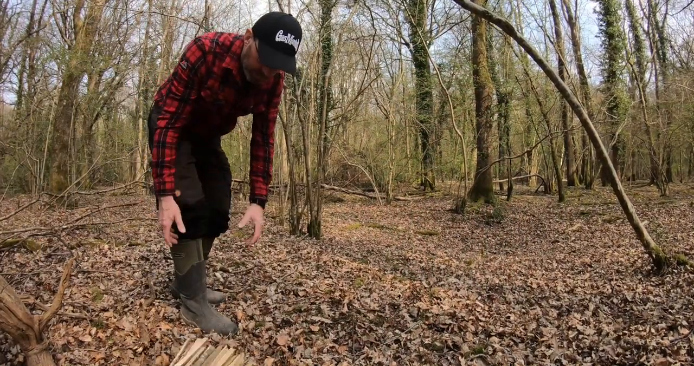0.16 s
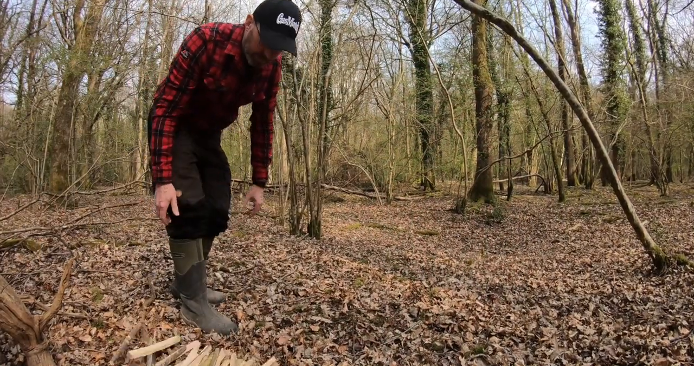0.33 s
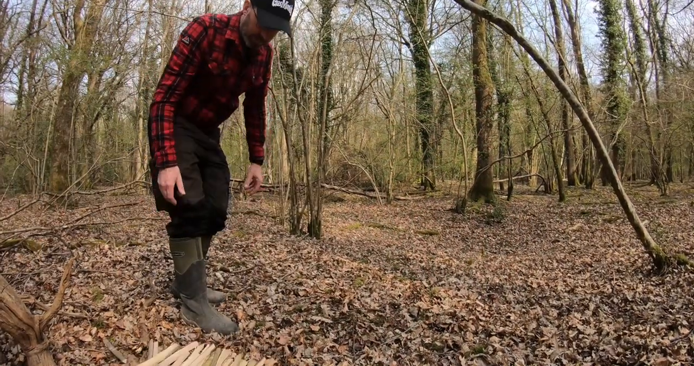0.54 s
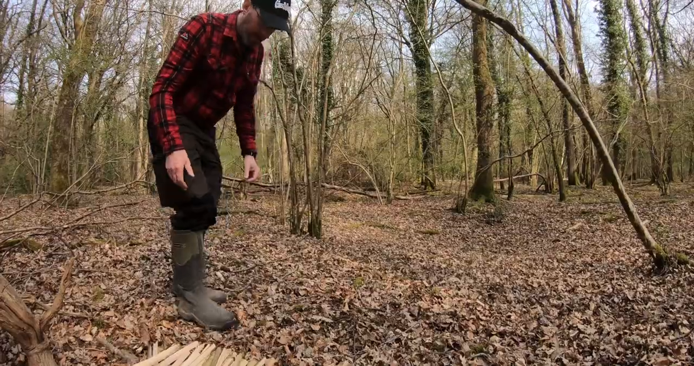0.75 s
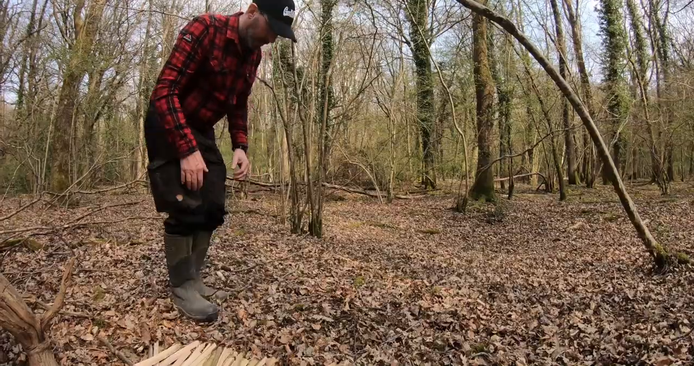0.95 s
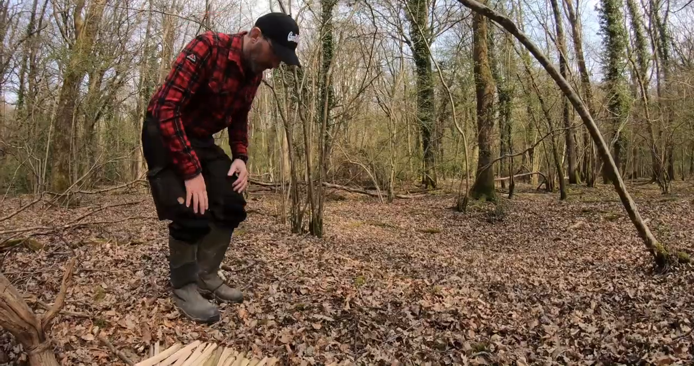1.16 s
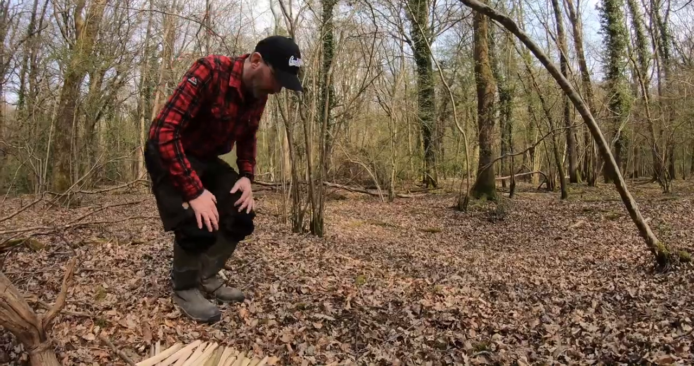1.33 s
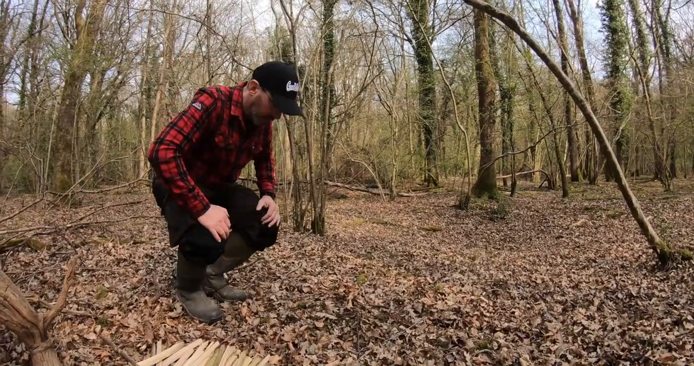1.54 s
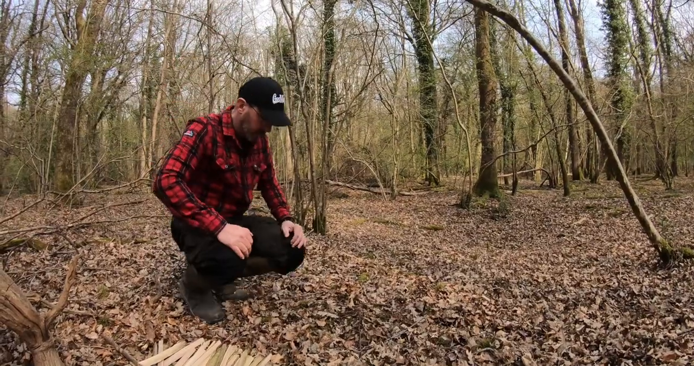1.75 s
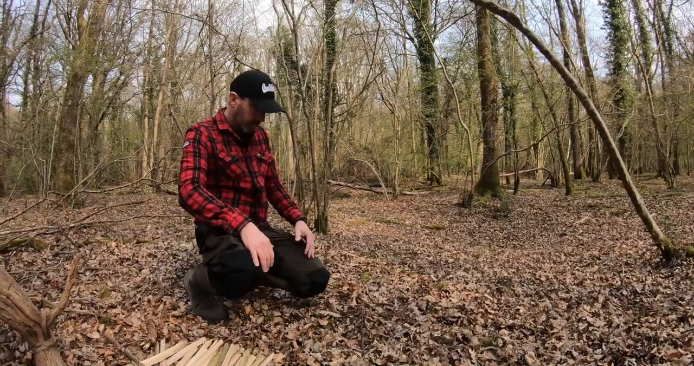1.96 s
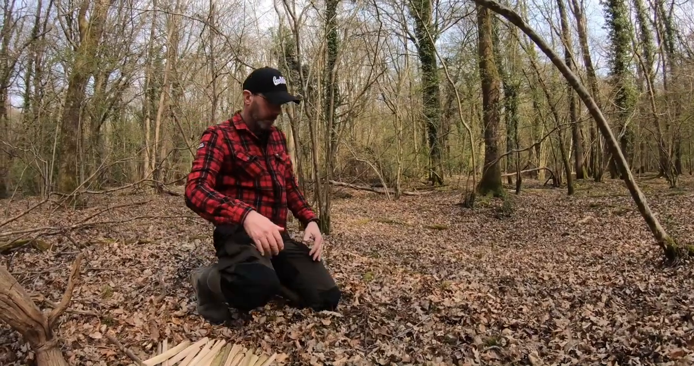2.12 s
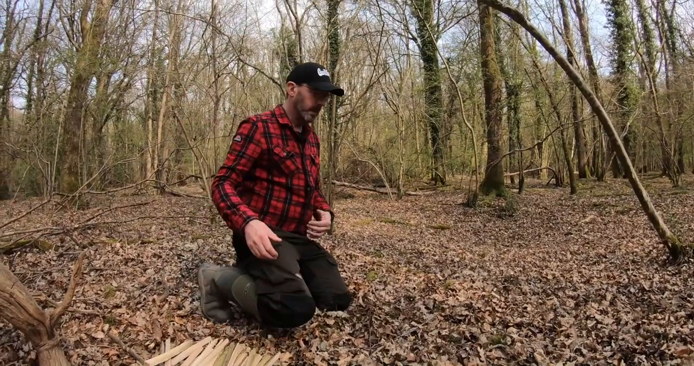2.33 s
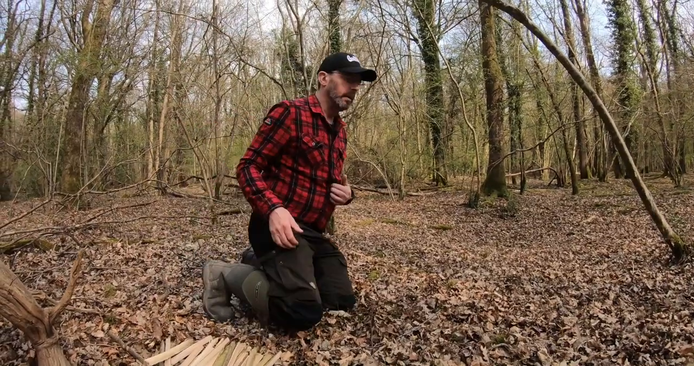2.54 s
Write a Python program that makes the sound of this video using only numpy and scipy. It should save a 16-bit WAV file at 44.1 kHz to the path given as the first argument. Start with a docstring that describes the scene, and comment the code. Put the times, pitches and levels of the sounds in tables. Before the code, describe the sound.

Split wooden sticks drop onto dry leaves with a crunch, soft thud and brief clatter; then boots and knees rustle the litter with sharp twig cracks, close stereo in a quiet wood with faint birds.

```python
"""A bundle of split sticks drops onto dry leaves in a quiet wood: a crunch, a thud, then a clatter as the pile spreads.
The clatter is decaying wood modes after rough contacts; the crunch is coloured crackle, the thud a damped low swing.
Close by, someone steps and kneels: leaves rustle as showers of tiny fractures, and twigs or joints crack as short snaps.
Far off a small bird pipes in arched sine notes over a blur of birdsong, and light air rumbles at the microphone,
all made of filtered noise but the notes. A close stereo pair hears it, with a faint echo from the trees."""
import sys
import numpy as np
from scipy import signal
from scipy.fft import rfft, irfft
from scipy.io import wavfile

SR = 44100
rng = np.random.default_rng(int(sys.argv[2]) if len(sys.argv) > 2 else 0)


def store_pcm(level_fs):
    """Save levels as 16-bit WAV."""
    pcm = np.round(np.clip(level_fs, -1, 1) * 32767).astype(np.int16)
    wavfile.write(sys.argv[1], SR, np.atleast_2d(pcm).T)


N = 114660  # length in samples


def amp(db):
    """Converts decibels to gain."""
    return 10 ** (np.asarray(db) / 20)


def unit(x):
    """Scales a signal to rms 1."""
    return x / np.sqrt(np.mean(x ** 2) + 1e-20)


def read(points, hz):
    """Reads a spectrum table on a log-frequency axis."""
    f, value = np.transpose(points)
    return np.interp(np.log(hz + 1), np.log(f + 1), value)


def level(rows, axis=1):
    """Gain over time from a table in dB; outside its span the end value fades away."""
    rows, t = np.array(rows), np.arange(N) / SR
    outside = np.maximum(np.maximum(rows[0, 0] - t, t - rows[-1, 0]), 0)
    gain = amp(np.interp(t, rows[:, 0], rows[:, axis]))
    return gain * np.exp(-outside / .03)


def add(mix, s, sound):
    """Mixes a sound in at a time in seconds."""
    part = mix[max(round(s * SR), 0):][:len(sound)]
    part += sound[:len(part)]


def causal(db_at, size=4096):
    """Minimum-phase impulse response: it starts at once and has the given spectrum."""
    hz = abs(np.fft.fftfreq(size, 1 / SR))
    log_gain = np.log(amp(np.maximum(db_at(hz), -90)))
    spectrum = np.exp(np.conj(signal.hilbert(log_gain)))
    return np.fft.ifft(spectrum).real[:size // 2]


def colour(x, points):
    """Filters a signal by a spectrum table, at rms 1."""
    response = causal(lambda hz: read(points, hz))
    return unit(signal.fftconvolve(x, response)[:len(x)])


def hump(hz, centre, octaves):
    """A broad peak in dB, with skirts that straighten on a log-frequency axis."""
    distance = np.log2((hz + 1) / centre) / octaves
    return -20 * (np.sqrt(1 + distance ** 2) - 1)


# Modes of the split sticks. Each row: frequency in Hz, level in dB, 60 dB decay time in seconds.
WOOD_MODES = [(700,-10,.05),(810,-6.5,0.043),(957,-10,0.11),(1202,-9.5,.12),(1310,-12,0.095),(1460,-1.5,0.042),(1637,-3.5,0.091),(2197,2,0.061),(2417,-3.5,0.048),(2966,-2,0.044),(3020,-15,0.045),(3182,1.5,0.046),(3620,0,0.042),(4398,-5,0.058),(4900,3,0.034),(5650,-6,.04)]
# Stick against stick, close by. Each row: start in seconds, level in dB,
# pitch that rings most in Hz, width of the ringing range in octaves.
KNOCKS = [(0.234,-28,5000,0.84),(0.2443,-19.5,4830,0.9),(.2492,-12.5,3070,0.31),(.2535,-14.5,3100,0.47),(.258,-13.5,2370,0.44),(0.2629,-29,960,0.33),(.280,-29,4150,0.43),(.304,-31.5,1680,0.89),(.331,-44,2020,1),(.361,-33,1310,.2),(.362,-41,2300,.6),(.368,-35,2200,0.62),(.392,-35,1900,0.64),(.410,-25,1770,0.48),(.416,-31,2420,.9),(.424,-35,1400,0.64),(.436,-29.5,1700,.6),(.445,-32,1080,.6),(.4505,-25.5,2950,0.25),(.453,-29.5,1637,0.22),(.469,-31,1190,.1),(.484,-33.5,1850,0.46),(0.498,-34,990,0.28),(.520,-36,1090,0.58),(.540,-45,1690,0.32),(.551,-53,850,0.35),(.575,-37.5,4040,.7),(.594,-50,1520,.7)]
MODE_SPREAD_DB, DETUNE = 2, 0.0032  # standard deviations per knock; detune as a fraction of pitch
CLACK_DB, CLACK_S, CLACK_OCTAVES = -3.5, 0.0042, 0.93  # rough contact: level, decay, bandwidth


def sticks():
    """Each knock is a short rough contact that rings the wood's modes around one pitch."""
    out, t = np.zeros(N), np.arange(SR // 4) / SR
    hz, db, t60 = np.transpose(WOOD_MODES)
    decay = np.exp(-np.log(1000) * t / t60[:, None])
    onset = 1 - np.exp(-t / 0.0005)
    for s, knock_db, centre, octaves in KNOCKS:
        strength, detune, sign = rng.standard_normal((3, len(hz)))
        weight = amp(db + MODE_SPREAD_DB * strength + hump(hz, centre, octaves))
        weight = np.sign(sign) * weight / np.linalg.norm(weight)
        mode_hz = hz * (1 + DETUNE * detune)
        modes = np.sin(2 * np.pi * mode_hz[:, None] * t) * decay
        ring = weight @ modes * onset
        contact = causal(lambda f: hump(f, centre, CLACK_OCTAVES))
        grit = signal.fftconvolve(rng.standard_normal(len(t)), contact)[:len(t)]
        clack = amp(CLACK_DB) * unit(grit) * np.exp(-t / CLACK_S)
        add(out, s, amp(knock_db) * (ring + clack))
    return out


FRACTURE_CAP = 3.67  # largest fracture, in multiples of the size spread


def crackle(per_s, spread_db):
    """Tiny leaf fractures as random clicks: many small, a few large."""
    size = amp(spread_db * np.minimum(rng.exponential(1, N), FRACTURE_CAP))
    return size * rng.choice([-1, 1], N) * (rng.random(N) < per_s / SR)


def thump(hz, rise_s):
    """A soft, heavily damped low swing whose envelope peaks after rise_s."""
    t = np.arange(SR // 4) / SR
    envelope = t / rise_s * np.exp(1 - t / rise_s)
    return np.sin(2 * np.pi * hz * t) * envelope


# The bundle crushes the leaves. Each row: time in seconds, level in dB.
CRUSH = [(.212,-79),(.224,-39.5),(.234,-27),(.246,-17.5),(.258,-25),(.267,-26),(.278,-43.5),(.31,-62)]
# Spectrum of the crushed litter. Each row: frequency in Hz, level in dB.
CRUSH_COLOUR = [(120, -30), (200, -26.5), (702, -7), (1510, -5), (2380, 0), (2650, -9), (3070, 6),
                (3750, -2), (4260, -3), (5700, -4.5), (8660, -18.5), (9480, -8), (15500, -44)]
# The ground takes the weight. Each row: start in seconds, level in dB, pitch in Hz,
# twice the envelope's rise time in seconds.
THUDS = [(.243,-35,267,0.0097),(.254,-40,168,0.014),(.264,-36,98,0.015)]


def landing():
    """The bundle crushes the leaf litter in a dense crackle and thuds on the soil."""
    fractures = crackle(per_s=9000, spread_db=1)
    out = colour(fractures, CRUSH_COLOUR) * level(CRUSH)
    for s, db, hz, double_rise_s in THUDS:
        add(out, s, amp(db) * thump(hz, double_rise_s / 2))
    return out


LEAF_PER_S, LEAF_SPREAD_DB = 5000, 2  # fractures per second, spread of their sizes
TICKS_PER_S, TICK_DB, TICK_SPREAD_DB = 320, -9, 2.6  # snaps above the rustle; level against it
TICK_LOW_HZ, TICK_HIGH_HZ, TICK_OCTAVES = 2500, 12000, .6  # range of pitches, width of each


def ticks(count=10):
    """Single leaf snaps, spread over a set of pitches, stand out of the rustle."""
    out = np.zeros(N)
    for centre in np.geomspace(TICK_LOW_HZ, TICK_HIGH_HZ, count):
        snap = unit(causal(lambda f: hump(f, centre, TICK_OCTAVES)))
        out += signal.fftconvolve(crackle(TICKS_PER_S / count, TICK_SPREAD_DB), snap)[:N]
    return amp(TICK_DB) * unit(out)


# Leaves under the sliding sticks. Each row: time in seconds, level in dB.
SETTLE = [(.25,-66),(.28,-40.5),(.34,-41.5),(.39,-39.5),(.45,-36),(.49,-37.5),(.52,-42.5),(.555,-36.5),(.585,-45.5),(.62,-53.5),(.75,-72)]
# Spectrum of those leaves. Each row: frequency in Hz, level in dB.
SETTLE_COLOUR = [(88, -62), (150, -32), (268, -11.5), (462, -18.5), (812, -4.5), (1090, -14.5), (1200, -8),
                 (1980, -11), (2230, -4), (2760, -12.5), (3040, -7), (9920, -18), (13800, -33),
                 (15500, -62)]


def leaves_under_pile():
    """Leaf fractures and single snaps crackle under the spreading pile."""
    fractures = crackle(LEAF_PER_S, LEAF_SPREAD_DB)
    return colour(unit(fractures) + ticks(), SETTLE_COLOUR) * level(SETTLE)


# Leaves under boots and knees. Each row: time in seconds, crackle level in dB, low crunch level in dB.
KNEEL = [(.6,-59,-67),(.73,-56,-63),(.775,-50,-62),(.86,-46.5,-54),(.95,-43.5,-56.5),(1.04,-36,-43),(1.07,-44.5,-51.5),(1.11,-54.5,-60.5),(1.16,-50,-59.5),(1.25,-50.5,-66),(1.295,-44.5,-56.5),(1.35,-49.5,-56.5),(1.44,-56.5,-69.5),(1.52,-57.5,-69),(1.625,-48.5,-60),(1.7,-53,-63.5),(1.79,-54.5,-68),(1.87,-50.5,-60),(1.96,-52.5,-68.5),(2.04,-49.5,-61),(2.19,-52.5,-71),(2.235,-46.5,-59.5),(2.26,-38.5,-56.5),(2.3,-44,-64),(2.39,-48.5,-58),(2.51,-48.5,-61.5),(2.6,-51.5,-66)]
# Spectrum of the crackle under boots. Each row: frequency in Hz, level in dB.
LEAF_COLOUR = [(530, -37.5), (900, -4.5), (1460, 1.5), (1870, -3), (2230, 0), (3060, -3), (4310, -1),
               (5020, -3.5), (6660, -6), (8430, -13.5), (9820, -9.5), (13700, -24), (15000, -31)]
# Spectrum of the crackle under knees. Each row: frequency in Hz, level in dB.
KNEE_COLOUR = [(530, -35), (900, -4), (1060, -8.5), (1480, -2), (1660, -10), (2030, 1), (2420, -10),
               (2790, -5.5), (3970, -6.5), (4460, -8.5), (5920, -10), (7230, -16.5), (9590, -12.5),
               (14100, -30), (15000, -35)]
# Spectrum of the low crunch. Each row: frequency in Hz, level in dB.
CRUNCH_COLOUR = [(60,-28),(150,-3),(300,6),(450,-4),(650,3),(950,-9.5),(1500,-15.5),(4000,-36.5)]
KNEES_S = 1.75  # the knees take over from here, within 0.1 s


def leaves_under_person():
    """One shower of fractures gives crisp crackle and low crunch, under boots and then knees."""
    fractures = crackle(LEAF_PER_S, LEAF_SPREAD_DB)
    snaps = unit(fractures) + ticks()
    knees = np.clip((np.arange(N) / SR - KNEES_S) * 10, 0, 1)
    crisp = (1 - knees) * colour(snaps, LEAF_COLOUR) + knees * colour(snaps, KNEE_COLOUR)
    crunch = colour(fractures, CRUNCH_COLOUR)
    return crisp * level(KNEEL) + crunch * level(KNEEL, axis=2)


def leaves():
    """All the rustling litter: under the pile and under the person."""
    return leaves_under_pile() + leaves_under_person()


# Twigs and joints crack. Each row: start in seconds, peak level in dB, centre in Hz, width in octaves,
# level of the dull knock in dB.
CRACKS = [(.769,-36,3200,0.78,-69),(1.050,-25,2500,1.5,-49),(1.171,-22.5,3120,0.89,-41),(1.1952,-34,600,1.1,-39),(1.269,-30.5,1350,.5,-50),(1.3292,-26,570,.5,-33),(1.3334,-30,500,1.1,-37),(1.638,-16,2090,.8,-28),(1.6395,-29,600,.8,-37.5),(1.6755,-35,3000,.7,-63),(1.8583,-23,2700,1.6,-44),(1.859,-29,1500,1.4,-74),(1.926,-36,7000,1.2,-70),(2.009,-36,8000,1.4,-68),(2.077,-34,8000,1.1,-70),(2.1153,-29,2630,0.92,-52),(2.219,-26,4950,0.65,-63),(2.223,-26.5,4200,0.73,-56),(2.254,-29,2700,0.85,-65),(2.3196,-29,2350,0.74,-49),(2.5125,-30,4030,.8,-69)]
SPLINTER, SPLINTER_S = .11, .002  # noise against the first click, decay
SNAP_TREBLE_DB = -23  # a second, weaker peak at 5200 Hz
KNOCK_HZ, KNOCK_RISE_S = 290, 0.0016


def cracks():
    """One sharp snap, a few milliseconds of splintering and a dull knock."""
    out, t = np.zeros(N), np.arange(SR // 40) / SR
    for s, db, centre, octaves, knock_db in CRACKS:
        def spectrum(f):
            """The crack's main peak, with the treble peak where that is louder."""
            return np.maximum(hump(f, centre, octaves), SNAP_TREBLE_DB + hump(f, 5200, 1))
        splinters = SPLINTER * rng.standard_normal(len(t)) * np.exp(-t / SPLINTER_S)
        snap = signal.fftconvolve((t == 0) + splinters, causal(spectrum))
        add(out, s, amp(db) * snap / abs(snap).max())
        add(out, s, amp(knock_db) * thump(KNOCK_HZ, KNOCK_RISE_S))
    return out


# Distant bird notes. Each row: start in seconds, length in seconds, level in dB, top pitch in Hz.
BIRD = [(0.19,.055,-49.5,3960),(0.673,.045,-54,3840),(0.719,0.055,-56,3760),(0.787,0.063,-50.5,3970)]
BIRD_ARCH = 0.052  # each end lies this fraction below the top pitch


def bird():
    """Thin sine whistles that swell and arch slightly in pitch."""
    out = np.zeros(N)
    for s, length, db, hz in BIRD:
        arch = np.sin(np.pi * np.linspace(0, 1, int(length * SR)))
        pitch = hz * (1 - BIRD_ARCH * (1 - arch) ** 2)
        add(out, s, amp(db) * arch * np.sin(2 * np.pi * np.cumsum(pitch) / SR))
    return out


# Far birdsong blurred by the trees. Each row: time in seconds, level in dB.
CHORUS = [(0,-63.5),(.09,-64),(.14,-71),(.4,-62.5),(2.6,-74)]
# Spectrum of that birdsong. Each row: frequency in Hz, level in dB.
CHORUS_COLOUR = [(2000,-35),(3100,-8),(4300,-4),(5200,-13.5),(7500,-19),(14000,-27.5)]


def chorus():
    """Far birdsong, blurred to a band of noise."""
    return colour(rng.standard_normal(N), CHORUS_COLOUR) * level(CHORUS)


# Wind rumble at the microphone. Each row: time in seconds, level in dB.
WIND = [(0,-59),(.2,-52.5),(.36,-60),(.55,-67.5),(.76,-51),(.9,-63),(1.1,-51.5),(1.38,-62),(1.6,-60.5),(2.15,-58.5),(2.28,-54.5),(2.42,-52.5),(2.58,-50.5)]
# Spectrum of the rumble. Each row: frequency in Hz, level in dB.
WIND_COLOUR = [(15,3),(40,-4.5),(75,2),(120,-6),(220,-11),(400,-21.5),(1200,-57)]


def wind():
    """A low breeze rumbles at the microphone as swelling, deep noise."""
    return colour(rng.standard_normal(N), WIND_COLOUR) * level(WIND)


# Spectrum of the still woodland air. Each row: frequency in Hz, level in dB.
AIR_COLOUR = [(88, -27.5), (150, -1.5), (300, -1.5), (556, -25), (701, -8.5), (1770, -17.5), (4210, -20),
              (10200, -37), (15000, -56)]


def air():
    """Still woodland air is a steady faint noise."""
    return amp(-66.5) * colour(rng.standard_normal(N), AIR_COLOUR)


# The trees' faint echo. Each row: frequency in Hz, 60 dB decay time in seconds.
WOODLAND = [(150,.4),(1000,1),(3000,0.97),(10000,1)]
ECHO_DB = -24.5


def trees(x):
    """Sparse echoes from trunks, different in each ear, die away at a rate set by frequency."""
    taps = rng.standard_normal((2, SR)) * (rng.random((2, SR)) < 2000 / SR)
    taps[:, :SR // 80] = 0  # no echo in the first 12.5 ms
    hz, t, z = signal.stft(taps, SR, nperseg=256)
    decay = np.exp(-np.log(1000) * t / read(WOODLAND, hz)[:, None])
    tail = signal.istft(z * decay, SR, nperseg=256)[1]
    return signal.fftconvolve(x[None], tail / np.linalg.norm(tail[0]), axes=1)[:, :N]


# Stereo width of the microphone pair. Each row: frequency in Hz, side against mid in dB.
WIDTH = [(30,-11),(90,-24),(300,-11),(2500,-12.5),(4300,-21.5),(6000,-16),(7500,-7),(9500,-3),(13000,-8)]
# Balance of the pair. Each row: frequency in Hz, left against right in dB.
LEAN = [(60, -0.56), (130, -0.5), (290, 0.043), (640, -0.36), (1410, -0.46), (3100, 0.45), (6820, -0.55),
        (15000, -0.13)]


def microphones(x):
    """Two close ports: nearly alike in the mids, apart in the high treble where scattered sound differs."""
    hz, t = np.fft.rfftfreq(N, 1 / SR), np.arange(SR // 20) / SR
    scatter = rng.standard_normal(len(t)) * np.exp(-t / .009)
    side = rfft(scatter / np.linalg.norm(scatter), N) * amp(read(WIDTH, hz))
    lean = amp(read(LEAN, hz) / 2)  # half on each port
    return irfft(rfft(x) * np.array([(1 + side) * lean, (1 - side) / lean]), N)


# Rustle that differs between the two ports. Each row: frequency in Hz, level in dB.
SCATTERED = [(100,-18),(2000,-18),(4200,-32),(6000,-18),(8000,-6.5),(10000,-5),(14000,-12)]
WIND_SIDE_DB = -9


def diffuse():
    """Further rustle and breeze reach the two ports in opposite polarity, which widens them."""
    share = amp(read(SCATTERED, np.fft.rfftfreq(N, 1 / SR)))
    rustle = irfft(rfft(leaves()) * share, N)
    side = rustle + amp(WIND_SIDE_DB) * wind()
    return np.array([side, -side])


def scene():
    """Sticks, person and bird before the microphone pair, with the background and the trees' echo."""
    near = sticks() + landing() + leaves() + cracks() + bird()
    background = air() + chorus() + wind()
    return microphones(near + background) + diffuse() + amp(ECHO_DB) * trees(near)


def record(dry):
    """The recorder's band limit: a steep low-pass at 15 kHz."""
    low_pass = signal.firwin(511, 15000, window=("kaiser", 9), fs=SR)
    return signal.oaconvolve(dry, low_pass[None], "same")


dry = scene()
out = record(dry)
store_pcm(out)
```